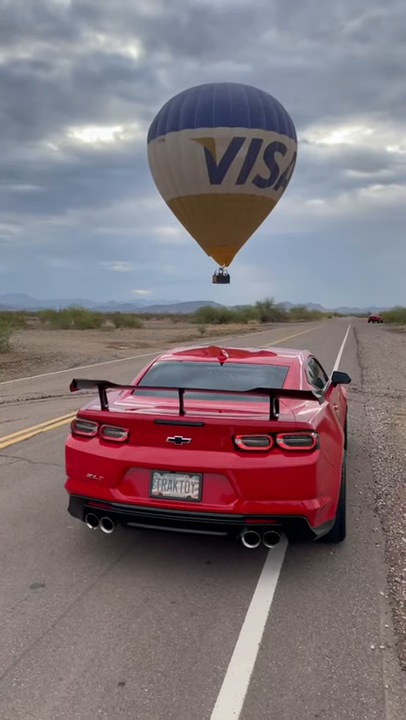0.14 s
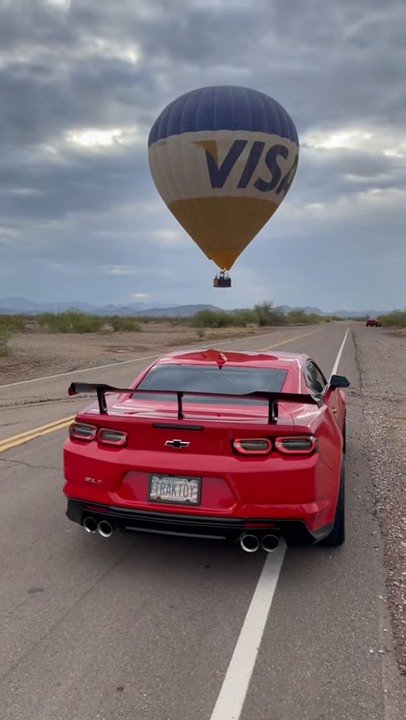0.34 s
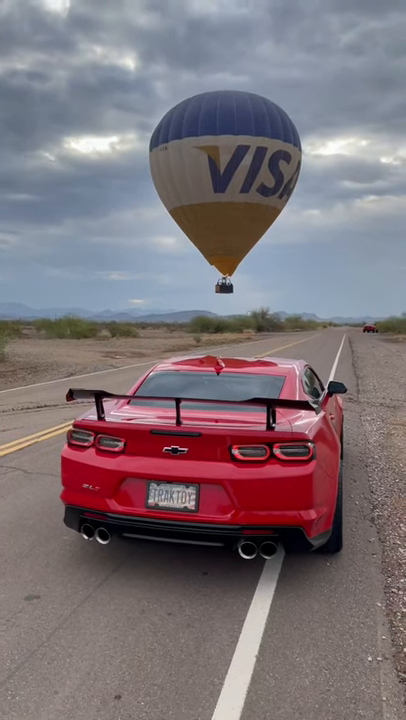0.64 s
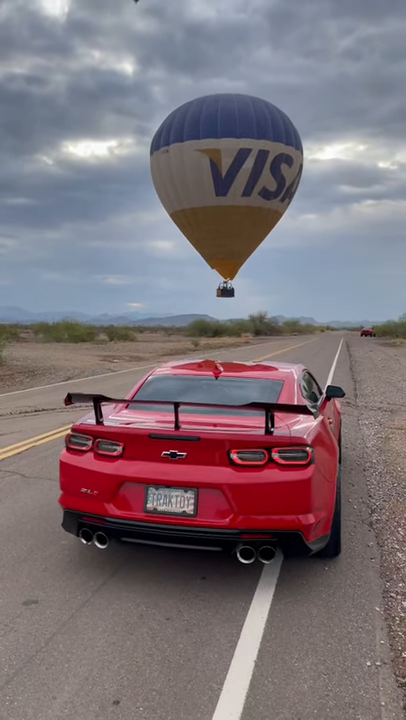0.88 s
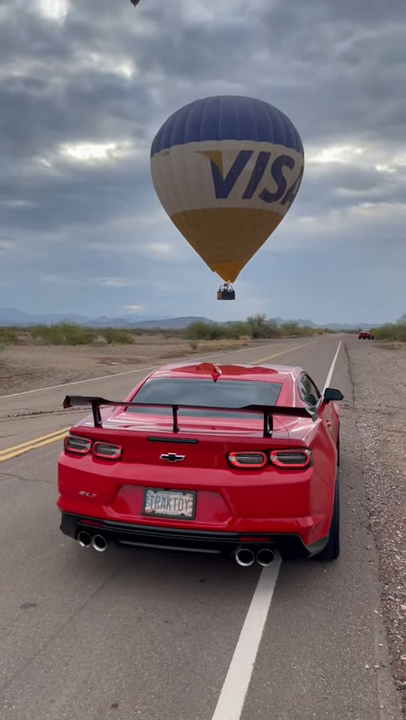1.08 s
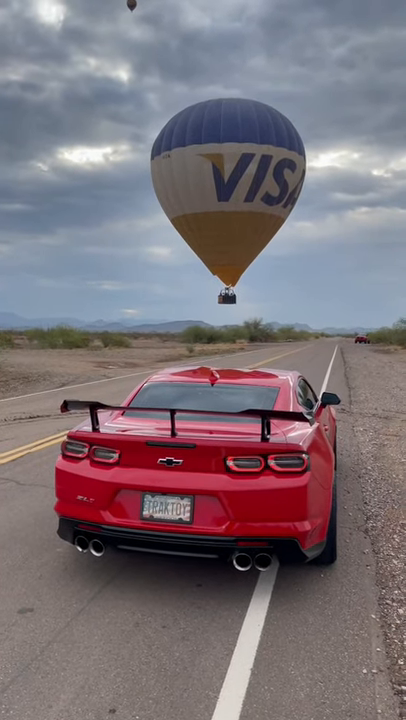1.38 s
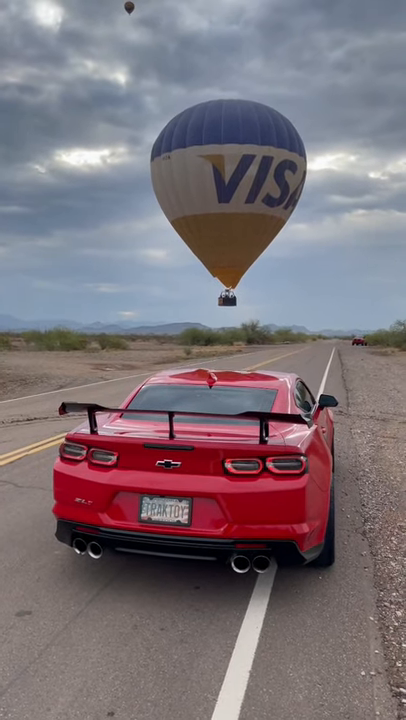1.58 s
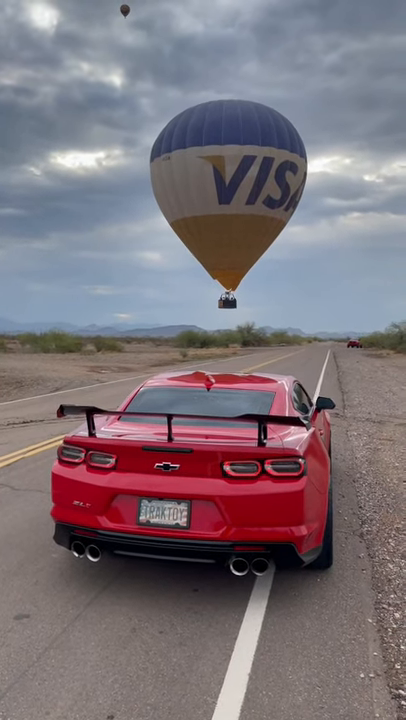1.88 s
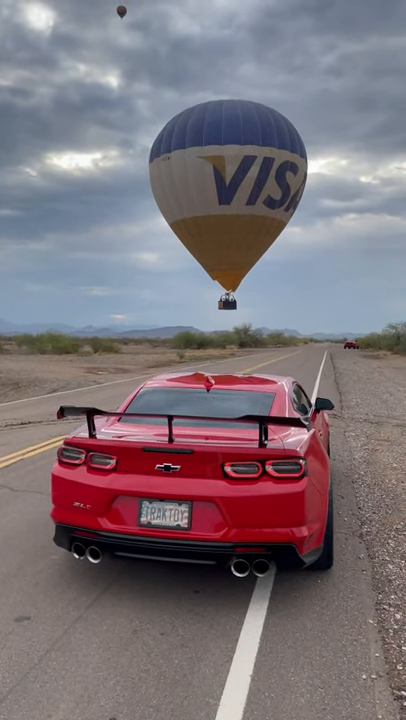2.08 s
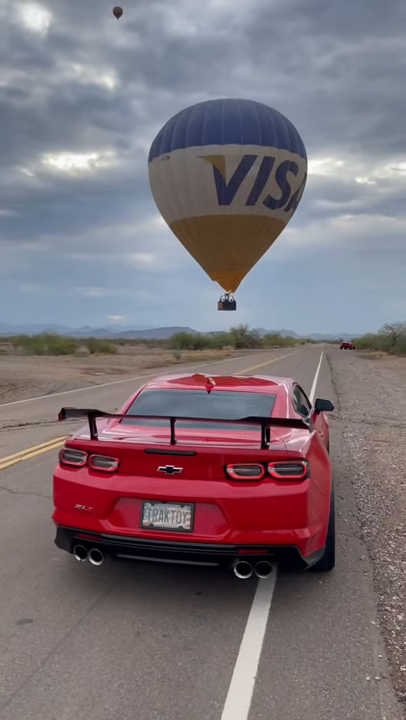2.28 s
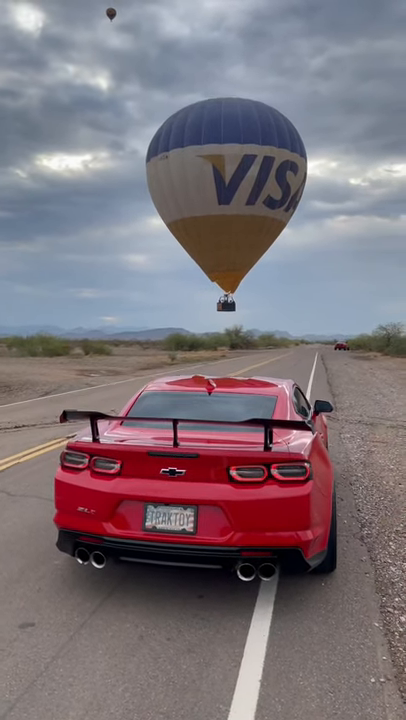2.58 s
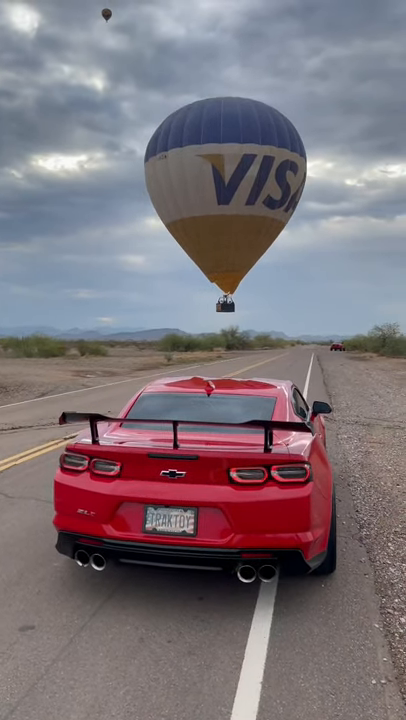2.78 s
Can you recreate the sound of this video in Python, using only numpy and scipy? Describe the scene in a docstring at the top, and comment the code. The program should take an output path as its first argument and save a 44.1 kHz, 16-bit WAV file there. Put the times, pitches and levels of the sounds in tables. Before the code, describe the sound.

A sports car idles throughout with a deep, slightly uneven exhaust throb, heard outdoors from a few metres behind. Tyres crunch faintly on asphalt, and a thin hiss fades after half a second. From about 1.3 to 2.4 seconds a few small stones snap while a light engine whirr swells. The crunch dies away around 2.7 seconds and the engine idles on.

```python
"""A V8 sports car idles on a desert road, heard from a few metres behind its tailpipes.
From the start, periodic firings drive the exhaust's resonances into a throb and burble, with a rush of
turbulent gas and a fine crunch like tyres creeping over asphalt. A thin hiss fades after half a second.
From 1.3 to 2.4 s small stones snap while the whirr of the engine bay swells.
At the end the crunch dies away and the engine idles on."""
import sys
import numpy as np
from scipy.fft import rfft, irfft, next_fast_len
from scipy.io import wavfile
from scipy.ndimage import map_coordinates

SR = 44100
rng = np.random.default_rng(int(sys.argv[2]) if len(sys.argv) > 2 else 0)


def wrap_up_sound(samples):
    """Save the sound to the file named by the first command line argument, as 16-bit audio."""
    columns = np.atleast_2d(samples).T
    # keep every value between -1 and 1, then stretch to whole-number steps
    tamed = np.clip(columns, -1, 1)
    steps = np.round(tamed * 32767).astype(np.int16)
    wavfile.write(sys.argv[1], SR, steps)


N = 129654

# Idle speed. Each row: time in seconds, firings per second.
FIRING_RATE = [(0, 38.5), (.35, 38.55), (.6, 38.15), (.95, 38.4), (1.3, 38.5), (1.85, 38.15), (2.25, 37.9),
               (2.94, 38.05)]
# Exhaust partials. Each row: multiple of the firing rate, relative level in dB.
PARTIALS = [(1, -9.5), (1.25, -17), (1.5, -15.5), (2, -0.5), (2.5, -17), (3, -7.5), (3.5, -19), (4, -17),
            (5, -22), (6, -21), (7, -14), (9.5, -27)]
# Uneven firings. Each row: time in seconds, sag or surge in dB.
STUMBLES = [(.14, -2), (.76, -7), (.9, 1.5), (.96, -3), (1.875, 4.5), (1.915, -8), (2.335, -6), (2.44, -8),
            (2.52, 3.5), (2.755, -8)]
THROB_DB, WAVER_DB, STUMBLE_S = -22.5, 0.7, .016
WANDER_S, WANDERS_PER_S, DISPERSION_RAD = .0004, 30, 1.7


def throb(firings):
    """Periodic excitation: firings make harmonics; unequal cylinders add the partials between, the lope."""
    t = np.arange(N) / SR
    stumble_db = sum(db * np.exp(-((t - s) / STUMBLE_S) ** 2) for s, db in STUMBLES)
    # The crankshaft runs early or late: phase modulation blurs the pitch of the high partials.
    crank = firings + WANDER_S * curve(FIRING_RATE) * wobble(WANDERS_PER_S)
    tone = np.zeros(N)
    for multiple, db in PARTIALS:
        # Dispersion delays higher partials more, so the throb rolls instead of thumping.
        phase = DISPERSION_RAD * multiple ** 2 - 2 * np.pi * multiple * crank
        tone += amp(db + WAVER_DB * wobble(14)) * np.sin(phase)
    return amp(THROB_DB + stumble_db) * np.sqrt(2) * tone


# Resonances of the pipes and silencer. Each row: frequency in Hz, relative gain in dB.
PIPE_RESPONSE = [(20, -32), (33, -19), (46, 2), (60, -3.5), (75, -3), (100, 1), (135, 1.5), (170, -2.5),
                 (205, -2.5), (228, -1), (243, -7), (270, -5.5), (288, -2.5), (305, -10), (350, -13.5),
                 (364, -8), (382, -18), (480, -25), (700, -55), (1500, -90)]
# Turbulence in the exhaust stream. Each row: frequency in Hz, relative spectral level in dB.
RUMBLE_SPECTRUM = [(15, -38), (27, -27), (42, -1.5), (70, 1), (105, 0), (150, -3.5), (190, -4.5), (280, -8),
                   (320, -15), (500, -37)]
BURBLE_DB, RUMBLE_DB = -32.3, -32.7
SMEAR_S, JITTER_S, SCATTER_DB = 0.01001, 0.0003, 0.7


def burble(firings, cylinders=8):
    """Source and filter: each cylinder's path to the tailpipe smears its puffs, amid turbulent rumble."""
    paths = rng.standard_normal((cylinders, 64))
    beats = np.arange(int(firings[-1]) + 1)
    jitter, scatter = rng.standard_normal((len(beats), 2)).T
    onsets = np.interp(beats, firings, np.arange(N)) + JITTER_S * SR * jitter
    onsets = np.clip(onsets, 0, N - 1).astype(int)
    sizes = amp(SCATTER_DB * scatter)
    puffs = np.zeros(N)
    for k, path in enumerate(paths):
        group_delay = lambda hz: SMEAR_S * map_coordinates(path, [hz / 45], mode="nearest")
        lag = lambda hz: 2 * np.pi * np.cumsum(group_delay(hz)) * hz[1]
        pulses = np.bincount(onsets[k::cylinders], sizes[k::cylinders], N)
        puffs += filtered(pulses, lambda hz: amp(along(PIPE_RESPONSE, hz)) * np.exp(-1j * lag(hz)))
    for multiple, _ in PARTIALS:  # take out the steady partials, which the throb plays
        partial = np.exp(2j * np.pi * multiple * firings)
        puffs -= 2 * np.real(np.mean(puffs * partial.conj()) * partial)
    return amp(BURBLE_DB) * unit(puffs) + amp(RUMBLE_DB) * rush(RUMBLE_SPECTRUM)


# Colour of the outflow. Each row: frequency in Hz, relative spectral level in dB.
GAS_SPECTRUM = [(25, -12), (80, 5), (250, 1.5), (400, 1), (500, -3.5), (600, 0.5), (700, 1), (775, 3),
                (870, -5), (1100, -3.5), (1400, -7), (1700, -15), (3000, -24.5), (6000, -45)]
# Its envelope. Each row: time in seconds, relative level in dB.
GAS_LEVEL = [(0, -42), (.6, -42), (.95, -39), (1.4, -41), (2, -41.5), (2.65, -40.7), (2.94, -43)]
GAS_DB, GAS_FLUTTER_DB = 3.5, 0.74


def tailpipe_gas():
    """Jet noise: turbulent gas leaving the tailpipes makes a fluttering rush."""
    return amp(curve(GAS_LEVEL) + GAS_DB + GAS_FLUTTER_DB * wobble(70)) * rush(GAS_SPECTRUM)


# Colour of the whirr. Each row: frequency in Hz, relative spectral level in dB.
BAY_SPECTRUM = [(800, -20), (1400, -9.5), (1700, -4.5), (2040, 0.5), (2170, 6), (2290, -.5), (2520, -4.5),
                (2900, -2.5), (3200, -11.5), (3600, -19), (5000, -28), (9000, -52)]
# Its envelope. Each row: time in seconds, relative level in dB.
BAY_LEVEL = [(0, -52.5), (.2, -49.5), (.6, -49.5), (1.3, -47.3), (2, -44), (2.4, -43.7), (2.7, -45),
             (2.94, -52.5)]
BAY_DB, BAY_FLUTTER_DB = 0.5, 0.95


def engine_bay():
    """Machinery noise: belts and valve gear blend into a fluttering band near 2.2 kHz."""
    return amp(curve(BAY_LEVEL) + BAY_DB + BAY_FLUTTER_DB * wobble(70)) * rush(BAY_SPECTRUM)


# Colours of crushed grit and rolling tread. Each row: frequency in Hz, relative spectral level in dB.
GRIT_SPECTRUM = [(3000, -45), (7000, -15), (8500, -15), (9300, -5), (10000, 7.5), (10800, -7), (11500, -18),
                 (12300, -44)]
ROLL_SPECTRUM = [(2000, -25), (3400, -1.5), (3750, -9.5), (4100, -2), (4450, -3.5), (4900, -3.5),
                 (5600, -3), (6300, 1.5), (7200, -2), (8500, -0.5), (10000, -6), (11000, -14), (12300, -44)]
# Their envelopes. Each row: time in seconds, relative level in dB.
GRIT_LEVEL = [(0, -59), (.3, -48.5), (.42, -52), (.58, -48.5), (1.05, -47.5), (1.3, -51), (1.58, -53.5),
              (1.8, -49.5), (2.2, -45.5), (2.45, -45.5), (2.7, -55), (2.94, -61)]
ROLL_LEVEL = [(0, -55.5), (.5, -53), (1, -49.5), (1.3, -50), (1.55, -51.5), (2.3, -50.5), (2.6, -51.5),
              (2.8, -57), (2.94, -75)]
GRAINS_PER_S, GRAIN_SPREAD_DB, ROLL_DB = 7000, 1.5, 2


def tyres():
    """Shot noise: random impulses of crushed grit merge into a crunch over a smooth rolling hiss."""
    crushed = rng.random(N) < GRAINS_PER_S / SR
    grains = crushed * amp(GRAIN_SPREAD_DB * rng.standard_normal(N))
    crunch = amp(curve(GRIT_LEVEL) + 1.04 * wobble(40.03)) * rush(GRIT_SPECTRUM, grains)
    hiss = amp(curve(ROLL_LEVEL) + ROLL_DB + 0.95 * wobble(24.97)) * rush(ROLL_SPECTRUM)
    return crunch + hiss


# Snapping stones. Each row: start in seconds, relative level in dB, length in seconds,
# share of the power in the stone's body from 0 to 1.
SNAPS = [(1.345, -39, .016, .95), (1.692, -29.5, .005, .25), (1.709, -41, .012, .3),
         (1.916, -40.5, .008, .9), (1.934, -44, .02, .4), (2.356, -38, .018, .35)]
# Colour of a stone's body. Each row: frequency in Hz, relative spectral level in dB.
STONE_SPECTRUM = [(1500, -20), (3500, -5), (4200, -1), (4650, 5.5), (5200, -3), (6400, -4.5), (9000, -3),
                  (12000, -25)]
SNAP_DB, SNAP_ATTACK_S = 3, 0.0005


def stones():
    """Damped transients: each snap decays exponentially; small stones sizzle, larger ones have body."""
    t, sizzle, body = np.arange(N) / SR, np.zeros(N), np.zeros(N)
    for start, db, length, share in SNAPS:
        age = np.maximum(t - start, 0)
        attack = 1 - np.exp(-age / SNAP_ATTACK_S)
        burst = amp(db + SNAP_DB) * attack * np.exp(-2 * age / length)
        sizzle += burst * np.sqrt(1 - share)
        body += burst * np.sqrt(share)
    return sizzle * rush(GRIT_SPECTRUM) + body * rush(STONE_SPECTRUM)


# Colour of the thin hiss. Each row: frequency in Hz, relative spectral level in dB.
HISS_SPECTRUM = [(2700, -28), (3500, -2), (4050, 6), (4500, -8), (5400, -48)]
# Its envelope. Each row: time in seconds, level in dB.
HISS_LEVEL = [(0, -54.5), (.5, -54.5), (1.1, -62), (1.8, -72)]


def thin_hiss():
    """Narrow-band noise: a hiss near 4 kHz holds for half a second, then fades."""
    return amp(curve(HISS_LEVEL)) * rush(HISS_SPECTRUM)


# Likeness of left and right. Each row: frequency in Hz, coherence from 0 to 1.
COHERENCE = [(170, .9999), (280, .999), (400, .98), (900, .91), (2000, .97), (2600, .82), (3200, .5),
             (4200, .72), (4800, .62), (5900, .97), (7200, .83), (8300, .95), (8900, .995), (9500, .98),
             (10800, .84), (11700, .96)]


def rush(spectrum, grains=1):
    """Partial coherence: mid and side noise, gated by grains and coloured, form a stereo pair of rms 1."""
    def colour(hz):
        angle = np.arccos(along(COHERENCE, hz)) / 2
        return amp(along(spectrum, hz)) * [np.cos(angle), np.sin(angle)]
    mid, side = filtered(grains * rng.standard_normal((2, N)), colour)
    return unit(np.array([mid + side, mid - side]))


def filtered(x, response):
    """Convolution theorem: filtering multiplies the spectrum by a complex response."""
    size = next_fast_len(N + SR // 2)
    hz = np.fft.rfftfreq(size, 1 / SR)
    return irfft(rfft(x, size) * response(hz), size)[..., :N]


def wobble(rate):
    """Random modulation: a spline through rate Gaussian knots a second."""
    return map_coordinates(rng.standard_normal(2048), [np.arange(N) * rate / SR], mode="wrap")


def curve(rows):
    """Linear interpolation of (seconds, value) rows at every sample."""
    return np.interp(np.arange(N) / SR, *np.transpose(rows))


def along(rows, hz):
    """Interpolation of (Hz, value) rows on a logarithmic frequency axis."""
    frequencies, values = np.transpose(rows)
    return np.interp(np.log(hz + 1), np.log(frequencies + 1), values)


def amp(db):
    """Amplitude ratio of a level in decibels."""
    return 10 ** (np.asarray(db) / 20)


def unit(x):
    """Normalisation to rms 1."""
    return x / np.sqrt(np.mean(x ** 2) + 1e-20)


def scene():
    """Superposition: the centred throb and puffs add to the slightly spread noises."""
    firings = np.cumsum(curve(FIRING_RATE)) / SR  # running count
    fade_in = curve([(0, 0), (.003, 1)])
    exhaust = (throb(firings) + burble(firings)) * fade_in
    return exhaust + tailpipe_gas() + engine_bay() + thin_hiss() + tyres() + stones()


# Stereo balance. Each row: frequency in Hz, level of left over right in dB.
BALANCE = [(350, 0), (500, 3), (620, 4.5), (790, 1.5), (1000, 9.5), (1150, 6.5), (1400, 0.5), (2200, -0.5),
           (3200, -2), (3600, -1), (5200, -2), (6200, -0.5)]
# Stereo phase. Each row: frequency in Hz, lead of left over right in radians.
PHASE_LEAD = [(330, 0), (480, 0.85), (600, 0), (950, 0.38), (1200, -0.6), (1400, 0), (2300, -0.8),
              (2900, 1.28), (3450, -2), (4000, -1.53), (4400, -1), (4900, -3), (5700, 0.5), (6200, 0.17),
              (7200, 1.7), (8500, 3), (9500, 3), (10500, 4.5), (11600, 8)]
BAND_LIMIT_HZ = 12258


def record(dry):
    """Spaced receivers: two microphone ports hear unequal level and phase, up to a band limit."""
    sides = np.array([[.5], [-.5]])
    def ports(hz):
        gain = amp(sides * along(BALANCE, hz))
        return gain * np.exp(1j * sides * along(PHASE_LEAD, hz)) * (hz < BAND_LIMIT_HZ)
    return filtered(dry, ports)


dry = scene()
out = record(dry)
wrap_up_sound(out)
```